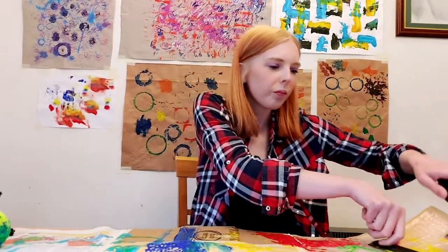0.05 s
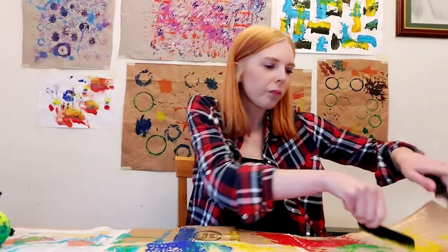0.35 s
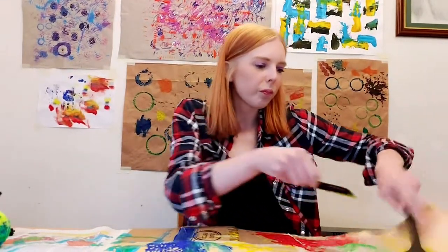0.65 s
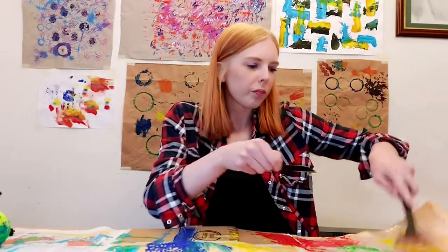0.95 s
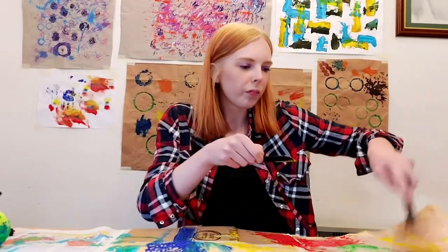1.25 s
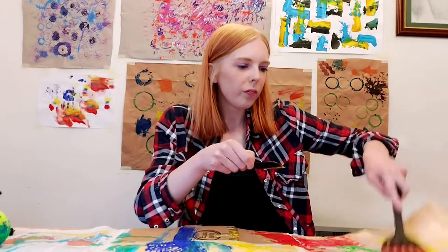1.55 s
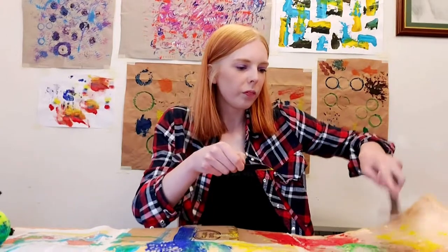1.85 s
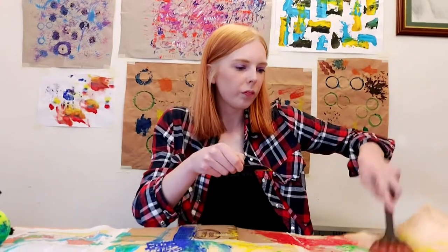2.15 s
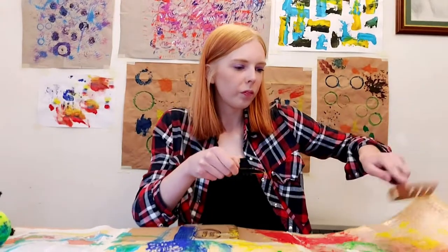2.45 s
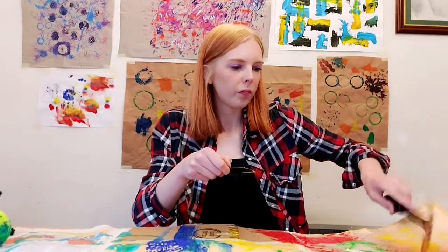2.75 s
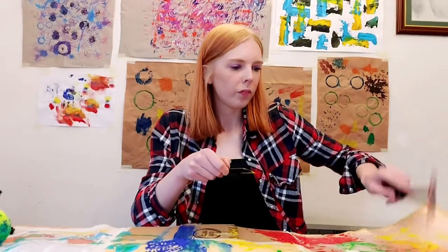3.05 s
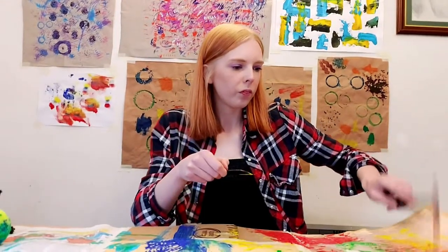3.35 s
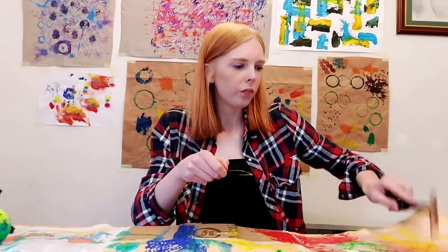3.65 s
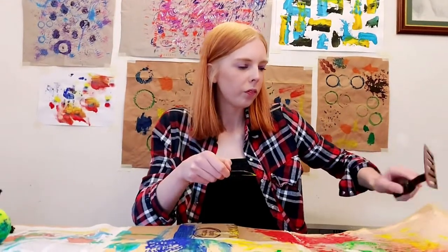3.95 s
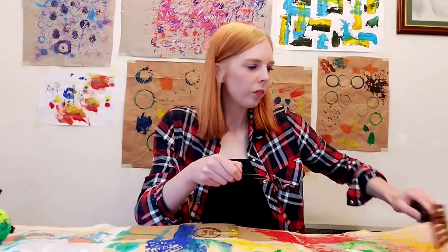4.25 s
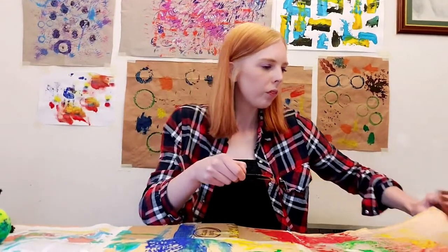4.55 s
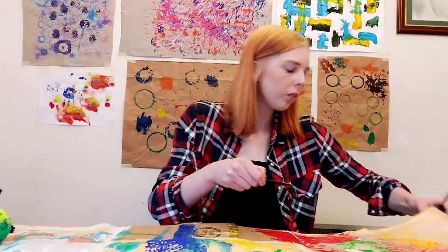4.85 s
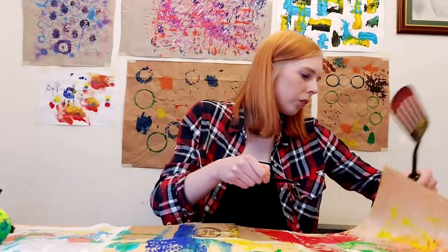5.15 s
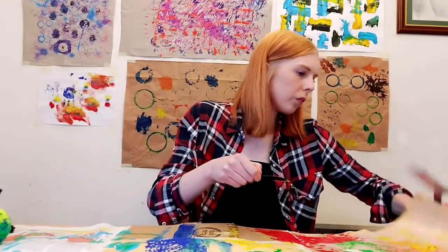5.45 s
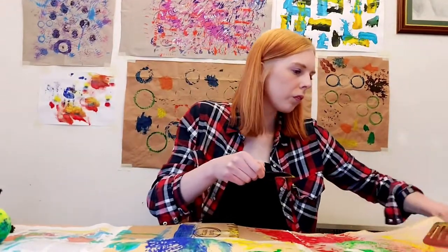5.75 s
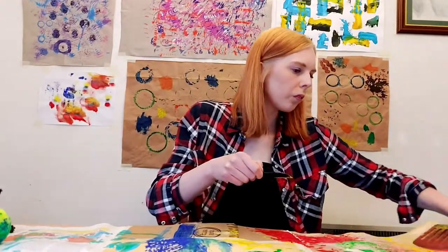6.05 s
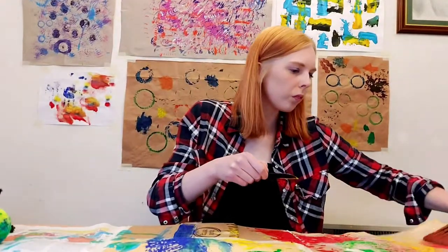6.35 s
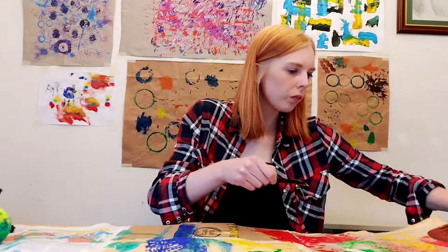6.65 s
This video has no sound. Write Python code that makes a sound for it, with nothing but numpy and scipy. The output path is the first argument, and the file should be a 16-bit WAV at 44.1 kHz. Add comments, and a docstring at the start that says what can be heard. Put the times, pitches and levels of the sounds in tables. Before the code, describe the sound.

In a small bare room, off to the right of the microphones, wet paint is slapped onto paper with a plastic spatula in a quick, even run of sticky dabs. The spatula then strikes the table sharply six times, louder than before. Afterwards the paper is picked up, shifted and laid down again, crackling and dragging softly, and settles with a few dull bumps.

```python
"""Wet dabs on paper: a plastic spatula loaded with paint, a sheet lying on a table, a small bare room.
Eleven dabs and a last light one (the edge touches, the blade slaps flat, the paint peels off) are
followed by six hard knocks that ring the table. Then the sheet is lifted and slid about, with rustles,
snaps and soft bumps. Paper and paint are swarms of tiny clicks; table and blade are decaying modes.
Everything happens to the right of the microphones."""
import sys
import numpy as np
from scipy import signal
from scipy.fft import rfft, irfft
from scipy.io import wavfile
from scipy.ndimage import uniform_filter1d

SR = 44100
rng = np.random.default_rng(int(sys.argv[2]) if len(sys.argv) > 2 else 0)


def int16_out(signal):
    """Quantize to a 16-bit WAV file."""
    q = np.round(np.clip(np.atleast_2d(signal).T, -1, 1) * 32767)
    wavfile.write(sys.argv[1], SR, q.astype(np.int16))


N = 299951
TIME = np.arange(N) / SR
TAIL = TIME[:SR // 2]   # time axis of one event or response

# dabs, timed at the moment the blade lies flat:
# t/s, slap/dB, slap tilt/(dB/oct), edge touch/dB, crush/dB, push/dB, push f/Hz, peel/dB
DABS = [(.346, -16, -1, -29, -13, -32, 150, -19), (0.575, -14.5, -1.5, -19, -15.5, -26.5, 193, -18.5),
        (.774, -11, -2.5, -23, -13, -12.5, 235.5, -21), (0.9814, -9.5, -1.5, -9, -36, -17, 221, -26.5),
        (1.187, -16.5, -1.5, -13.5, -37, -36.5, 238, -17.5),
        (1.4036, -13.5, -2, -8.5, -31.5, -27.5, 132, -19),
        (1.6038, -12, -0.5, -10.5, -32.5, -23.5, 132, -20.5), (1.809, -12, -1.5, -12, -14, -17, 114, -22.5),
        (2.013, -12.5, -0.5, -13, -29, -21, 112, -24), (2.212, -8.5, -.5, -14, -31, -16.5, 121, -34),
        (2.417, -7.5, -1, -14, -16.5, -15, 115, -20.5), (2.684, -31, -1.5, -34, -31, -47.5, 200, -49.5)]
# knocks on the table, six hard and a late faint one: t/s, level/dB, tilt/(dB/oct)
KNOCKS = [(2.8753, -5, 0.5), (3.0684, -5, -.5), (3.2861, -6.5, -0.5), (3.49, -5.5, 0), (3.687, -5.5, 0.5),
          (3.893, -6, 0.5), (6.5090, -25.5, -2)]
# spectrum of buckling paper: f/Hz, level/dB
PAPER_SPECTRUM = [(100, -18), (400, -3), (900, 0), (1400, -1), (2000, 5.5), (2800, -2.5), (4000, -0.5),
                  (6000, -5.5), (7800, -4.5), (9500, -15.5), (14500, -18.5)]


def from_db(db):
    """Decibels to gain."""
    return 10 ** (np.asarray(db) / 20)


def at_hz(points, hz):
    """Interpolate a curve on a log-frequency axis."""
    f_hz, value = np.transpose(points)
    return np.interp(np.log(np.maximum(hz, 1)), np.log(f_hz), value)


def unit_energy(x):
    """Scale to energy 1."""
    return x / np.sqrt(np.sum(x ** 2, axis=-1, keepdims=True) + 1e-20)


def causal_filter(points, size=4096):
    """Minimum-phase impulse response of a spectrum."""
    hz = np.arange(size // 2 + 1) * SR / size
    cepstrum = irfft(np.log(from_db(at_hz(points, hz))))
    cepstrum[1:size // 2] *= 2
    cepstrum[size // 2 + 1:] = 0
    return irfft(np.exp(rfft(cepstrum)))[:size // 2]


def through(x, response):
    """Convolve, keeping the length."""
    return signal.oaconvolve(x, response)[:len(x)]


def coloured(x, points):
    """Give a white sound a spectrum at equal power."""
    return through(x, unit_energy(causal_filter(points)))


def tilted(x, db_per_oct):
    """Brighten or dull about 2 kHz."""
    return through(x, causal_filter([(500, -2 * db_per_oct), (16000, 3 * db_per_oct)], size=512))


def evened(response, width_hz):
    """Many overlapping arrivals leave fine spectral ripple but no broad colour."""
    spectrum = rfft(response, SR)   # 1 Hz bins
    power = uniform_filter1d(np.abs(spectrum) ** 2, width_hz)
    return irfft(spectrum / np.sqrt(power + 1e-12), SR)[:len(response)]


def add(track, t_s, sound):
    """Mix a sound into a track at t_s."""
    start = max(round(t_s * SR), 0)
    track[start:start + len(sound)] += sound[:N - start]


def click():
    """One sharp contact; energy 1."""
    return signal.unit_impulse(len(TAIL))


def grains(per_s, spread_db, size):
    """Tiny clicks of uneven size at random moments; rms 1."""
    heights = from_db(spread_db * np.minimum(rng.exponential(1, size), 5))
    signs = rng.choice([-1, 1], size)
    occurs = rng.random(size) < per_s / SR
    return unit_energy(heights * signs * occurs) * np.sqrt(size)


def burst(decay_s, rise_s, per_s, spread_db):
    """A swarm of clicks that swells and dies away; energy 1."""
    envelope = (1 - np.exp(-TAIL / rise_s)) * np.exp(-TAIL / decay_s)
    return unit_energy(grains(per_s, spread_db, len(TAIL)) * envelope)


def noise_floor():
    """Faint steady noise, mostly bass, independent in each channel."""
    # background spectrum: f/Hz, level/dB
    floor_spectrum = [(25, -1), (60, -4), (140, -1.5), (300, -15), (900, -16.5), (2000, -19.5), (7500, -24),
                      (8500, -28.5), (14500, -30.5)]
    return np.array([coloured(rng.standard_normal(N), floor_spectrum) for _ in range(2)])


def room_response(direct_db, early_db):
    """Direct sound, early reflections from table and walls, and a tail that dies band by band."""
    # reverberation time: f/Hz, t60/s
    room_t60 = [(80, 0.84), (210, 0.33), (560, 0.37), (1470, 0.3274), (3880, 0.29), (10200, 0.25)]
    edges_hz = np.concatenate([[0], np.geomspace(125, 8000, 7), [SR]])
    hz = np.arange(len(TAIL) // 2 + 1) * SR / len(TAIL)
    white = rfft(rng.standard_normal(len(TAIL)))
    tail = 0
    for low, high in zip(edges_hz, edges_hz[1:]):
        band = irfft(white * (hz >= low) * (hz < high), len(TAIL))
        tail += band * from_db(-60 * TAIL / at_hz(room_t60, low * np.sqrt(2)))
    tail = unit_energy(tail * (1 - np.exp(-TAIL / 0.0058)))
    early = burst(decay_s=0.0043, rise_s=0.00065, per_s=5000, spread_db=0.5)
    direct = signal.lfilter(*signal.butter(3, 7500, fs=SR), click())   # off-axis treble loss
    return evened(from_db(direct_db) * direct + from_db(early_db) * early + tail, width_hz=120)


def in_room(x, direct_db, early_db, left_lag_s=0.00025):
    """Each source has its own paths to the microphones; the left hears it later and less directly."""
    left = through(x, room_response(direct_db - 6.5, early_db))
    right = through(x, room_response(direct_db, early_db))
    return np.array([np.interp(TIME - left_lag_s, TIME, left), right])


def across_sheet(x, direct_db, early_db, spots, dwell_s=0.29):
    """The sounding spot moves over the sheet, and its room paths change with it."""
    spot = TIME // dwell_s % spots
    gates = [uniform_filter1d(1.0 * (spot == k), 256) for k in range(spots)]
    return sum(in_room(x * gate, direct_db, early_db) for gate in gates)


def friction_gain(per_s, spread_db):
    """Friction makes the level jump about at random."""
    steps = rng.standard_normal(N // 100)
    return from_db(spread_db * np.interp(TIME * per_s, np.arange(len(steps)), steps))


def sliding_sheet(lifted_s=4.2, hollow_hz=1030, hollow_db=10):
    """Fibres catch and let go: a crisp rustle with stray small snaps, over a dull drag on the table."""
    # envelopes of the sheet's four moves: t/s, rustle/dB, drag/dB
    nudge = [(0, -53, -59.5), (0.1, -47, -70.5), (0.23, -51.5, -64.5), (0.31, -45.5, -55)]
    pick_up = [(4.28, -80.5, -90), (4.34, -44, -50.5), (4.41, -45, -47.5), (4.56, -63, -56),
               (4.69, -74, -66), (4.8, -79, -83)]
    raise_up = [(4.961, -72.5, -90), (5.021, -58.5, -63), (5.05, -46, -51.5), (5.14, -54.5, -55),
                (5.21, -52.5, -46), (5.35, -53, -60), (5.43, -48, -40), (5.5, -49.5, -63), (5.56, -44, -41),
                (5.72, -47.5, -55), (5.86, -55, -66), (5.949, -51, -61)]
    lay_down = [(5.95, -53, -73), (6.05, -47, -50), (6.13, -51, -59.5), (6.3, -60, -52.5), (6.48, -50, -46),
                (6.568, -52, -35.5), (6.679, -68.5, -69), (6.8, -72, -51.5)]
    # friction spectra: f/Hz, level/dB
    rustle_spectrum = [(400, -44), (1000, -14), (1900, 1.5), (2800, -1), (4000, -1.5), (6000, 0), (7800, 0),
                       (9500, -7.5), (12500, -7), (14500, -16)]
    drag_spectrum = [(40, -50), (80, -19.5), (130, -5.5), (230, -5.5), (400, 2.5), (600, 2), (800, 4),
                     (1200, -8.5), (2200, -8), (6000, -41)]
    rustle_gain, drag_gain = np.zeros(N), np.zeros(N)
    for move in (nudge, pick_up, raise_up, lay_down):
        t_s, rustle_db, drag_db = np.transpose(move)
        rustle_gain += from_db(np.interp(TIME, t_s, rustle_db, left=-np.inf, right=-np.inf))
        drag_gain += from_db(np.interp(TIME, t_s, drag_db, left=-np.inf, right=-np.inf))
    fibres = friction_gain(per_s=180, spread_db=1.0) * grains(per_s=3700, spread_db=1.0, size=N)
    small_snaps = from_db(-2.5) * grains(per_s=20, spread_db=0.0, size=N)
    rustle = coloured(rustle_gain * (fibres + small_snaps), rustle_spectrum)
    hollow = signal.lfilter(*signal.iirpeak(hollow_hz, Q=1.8, fs=SR), rustle)
    rustle += from_db(hollow_db) * hollow * (TIME > lifted_s)   # the lifted, bent sheet resonates
    drag = coloured(drag_gain * grains(per_s=3300, spread_db=6.5, size=N), drag_spectrum)
    return from_db(-1) * rustle + from_db(-0.5) * drag


def patch_hz(centre_hz=2050, spread_oct=0.2):
    """Each touch lands on another patch of the sheet, with its own pitch."""
    return centre_hz * 2 ** (spread_oct * rng.uniform(-1, 1))


def sheet_ring(x, hz, ring_db):
    """A struck patch of paper favours one broad band."""
    return x + from_db(ring_db) * signal.lfilter(*signal.iirpeak(hz, Q=1.6, fs=SR), x)


def crinkle(db, hz, db_per_oct, decay_s, rise_s=0.004):
    """One run of tiny buckles in the sheet."""
    buckles = burst(decay_s, rise_s, per_s=3000, spread_db=4.5)
    return from_db(db + 16) * tilted(sheet_ring(buckles, hz, ring_db=-10), db_per_oct)


def paper_crinkles(crush_lead_s=0.014, peel_delay_s=0.064):
    """The sheet crinkles as each dab lands, as the paint pulls it up again, and in the hand."""
    # crumples in the hand: t/s, level/dB, tilt/(dB/oct), f/Hz
    crumples = [(4.405, -20.5, 0, 4200), (5.407, -32.5, -7.5, 1330), (5.709, -18, -2.5, 1300)]
    out = np.zeros(N)
    for t_s, _, _, _, crush_db, _, _, peel_db in DABS:
        crush = crinkle(crush_db, patch_hz(), db_per_oct=2.7, decay_s=0.01, rise_s=0.009)
        peel = crinkle(peel_db, patch_hz(), db_per_oct=-1, decay_s=0.028)
        add(out, t_s - crush_lead_s, crush)
        add(out, t_s + peel_delay_s, peel)
    for t_s, db, db_per_oct, hz in crumples:
        add(out, t_s, crinkle(db, hz, db_per_oct, decay_s=0.016))
    return coloured(out, PAPER_SPECTRUM)


def paper_snaps(touch_lead_s=0.0067, touch_db_per_oct=-2.5, buckle_db_per_oct=-0.5):
    """The sheet snaps sharply when the blade's edge touches it and when it buckles."""
    # sudden buckles: t/s, level/dB
    buckles = [(.663, -23), (1.675, -20), (1.733, -22), (2.708, -26), (4.434, -22), (4.575, -34.5),
               (4.609, -29), (4.691, -40), (5.164, -25.5), (5.182, -23.5), (5.242, -12.5), (5.409, -25),
               (5.531, -19), (5.696, -25), (5.804, -28.5), (5.922, -34), (6.047, -27.5), (6.082, -25)]
    events = [(t_s - touch_lead_s, touch_db, touch_db_per_oct) for t_s, _, _, touch_db, *_ in DABS]
    events += [(t_s, db, buckle_db_per_oct) for t_s, db in buckles]
    out = np.zeros(N)
    for t_s, db, db_per_oct in events:
        crackle = burst(decay_s=0.00068, rise_s=0.00023, per_s=16000, spread_db=4.5)
        snap = evened(click() + 1.1 * crackle, width_hz=1200)
        add(out, t_s, from_db(db + 17) * tilted(snap, db_per_oct))
    return coloured(out, PAPER_SPECTRUM)


def push_force(lead_s=0.001):
    """A push cushioned by paint and paper holds only low pitches, chiefly one set by contact time."""
    # soft bumps as the sheet settles on the table: t/s, level/dB, f/Hz
    bumps = [(5.613, -35, 156), (5.699, -45, 170), (6.042, -34, 355), (6.221, -40.5, 153),
             (6.512, -26, 377), (6.535, -28.5, 156), (6.548, -34, 353)]
    events = [(t_s - lead_s, push_db, hz, click()) for t_s, *_, push_db, hz, _ in DABS]
    for t_s, db, hz in bumps:
        events.append((t_s, db, hz, burst(decay_s=0.015, rise_s=0.0026, per_s=3800, spread_db=1.5)))
    force = np.zeros(N)
    for t_s, db, hz, contact in events:
        w = 2 * np.pi * hz
        cushion = signal.bilinear([w * w], [1, 0.69 * w, w * w], fs=SR)   # resonant low-pass
        add(force, t_s, from_db(db + 11) * unit_energy(signal.lfilter(*cushion, contact)))
    return force


def table_ring(knocks, pushes):
    """Table modes reach both microphones nearly in step in the bass, with unrelated phases higher up."""
    # modes of the table: f/Hz, level/dB, t60/s
    table_modes = [(96.4, -15, 0.27), (105.9, -6.5, 0.27), (130, -17, 0.15), (145.7, -11.5, 0.5),
                   (164.9, -8, 0.37), (185.6, -11.5, 0.4), (239.8, -7.5, 0.4), (273, -2, 0.27),
                   (331, -12.5, .36), (400, -3, 0.26), (511, -5, .2), (559, -12, .25), (700.4, -5, .33),
                   (882, -14.5, 0.26), (970, -11, .26), (1082, -16, 0.34), (1555, -12, .25),
                   (1765, -22.5, .25), (2040, -17, .22)]
    # knocks are too brief to sway the whole table
    force = signal.lfilter(*signal.butter(2, 150, "high", fs=SR), knocks) + from_db(3.5) * pushes
    hz, db, t60_s = np.transpose(table_modes)[:, :, None]
    build_up = 1 - np.exp(-TAIL * hz / 0.39)   # within a cycle
    envelope = build_up * from_db(db - 60 * TAIL / t60_s)
    right_rad = rng.uniform(0, 2 * np.pi, hz.shape)
    left_rad = right_rad + rng.normal(0, 1, hz.shape) * hz / 330
    sides = [envelope * np.sin(2 * np.pi * hz * TAIL + phase) for phase in (left_rad, right_rad)]
    return np.array([through(force, modes.sum(axis=0)) for modes in sides])


def blade_clack(force):
    """The stiff plastic blade rings for a few milliseconds."""
    # modes of the blade: f/Hz, level/dB, t60/s
    blade_modes = [(1060, -2.5, 0.016), (1650, -1, 0.017), (2025, 9, 0.018), (2200, -10, 0.0037)]
    hz, db, t60_s = np.transpose(blade_modes)[:, :, None]
    modes = from_db(db - 60 * TAIL / t60_s) * np.sin(2 * np.pi * hz * TAIL)
    return through(force, unit_energy(modes.sum(axis=0)))


def knock_hiss(hiss_lead_s=0.005):
    """A short bright hiss starts just before each knock."""
    out = np.zeros(N)
    for t_s, db, db_per_oct in KNOCKS:
        hiss = burst(decay_s=0.027, rise_s=0.0033, per_s=8100, spread_db=6.0)
        add(out, t_s - hiss_lead_s, from_db(db + 1.5) * tilted(hiss, db_per_oct + 2))
    return coloured(out, PAPER_SPECTRUM)


def knock_force():
    """The spatula hits the table: a click with a brief chatter."""
    force = np.zeros(N)
    for t_s, db, db_per_oct in KNOCKS:
        chatter = burst(decay_s=0.028, rise_s=0.001, per_s=1100, spread_db=2.0)
        add(force, t_s, from_db(db + 21) * tilted(click() + 0.3 * chatter, db_per_oct))
    return force


def wet_slaps(threads_db=-13):
    """Paint is squeezed out in a dense spatter, then crackles as its threads break."""
    # spectrum of wet paint: f/Hz, level/dB
    wet_spectrum = [(100, -7), (300, 0.5), (500, -3.5), (900, -1.5), (1350, -5), (2050, -2.5), (2800, -6.5),
                    (4300, -5), (6000, -6.5), (7800, -9), (9500, -15), (14500, -20)]
    out = np.zeros(N)
    for t_s, db, db_per_oct, *_ in DABS:
        spatter = burst(decay_s=0.0032, rise_s=0.00023, per_s=5800, spread_db=1.5)
        threads = burst(decay_s=0.042, rise_s=0.08, per_s=800, spread_db=4.0)
        slap = sheet_ring(spatter + from_db(threads_db) * threads, patch_hz(), ring_db=-5.5)
        add(out, t_s, from_db(db + 21) * tilted(slap, db_per_oct))
    return coloured(out, wet_spectrum)


def scene():
    """Paint, paper and table sound in the room; the left microphone faces away from them."""
    # spectra of the table under hard knocks and soft pushes: f/Hz, level/dB
    knock_spectrum = [(40, -37), (80, -24), (150, -3), (430, 4), (700, -0.5), (1150, -2.5), (1380, -9),
                      (1650, -3), (2100, -11), (2800, -13), (3800, -24.5), (7500, -28), (9500, -36),
                      (14500, -36.5)]
    thud_spectrum = [(25, -31.5), (55, -21), (80, -12), (110, -2.5), (280, -2), (400, -10), (800, -15),
                     (2000, -22)]
    # left microphone against the right: f/Hz, level/dB
    left_response = [(80, -6.5), (250, -7), (1100, -6), (2200, -7), (4000, -6), (7500, -11.5), (11000, 1),
                     (14000, -2)]
    knocks, pushes = knock_force(), push_force()
    bursts = wet_slaps() + paper_crinkles() + knock_hiss()
    out = from_db(2.5) * across_sheet(bursts, direct_db=5.5, early_db=3, spots=3)
    out += from_db(2.5) * across_sheet(paper_snaps(), direct_db=4, early_db=3.5, spots=2)
    out += from_db(1.5) * in_room(sliding_sheet(), direct_db=6.5, early_db=1.5)
    out += from_db(1) * in_room(coloured(knocks, knock_spectrum), direct_db=-3, early_db=3.5)
    out += from_db(-2) * in_room(blade_clack(knocks), direct_db=12, early_db=15)
    out += from_db(-5.5) * in_room(coloured(pushes, thud_spectrum), direct_db=12.5, early_db=-8)
    out += from_db(-34.5) * table_ring(knocks, pushes)
    out += from_db(-77.5) * noise_floor()
    return np.array([through(out[0], causal_filter(left_response)), out[1]])


def record(dry):
    """Bass cut, soft clipping of the highest peaks, top cut."""
    low_hz, top_hz, ceiling = 45, 14650, 0.95
    x = signal.lfilter(*signal.butter(2, low_hz, "high", fs=SR), dry)
    rounded = x / (1 + (x / ceiling) ** 4) ** 0.25
    return signal.sosfilt(signal.ellip(10, 0.1, 80, top_hz, fs=SR, output="sos"), rounded)


dry = scene()
out = record(dry)
int16_out(out)
```